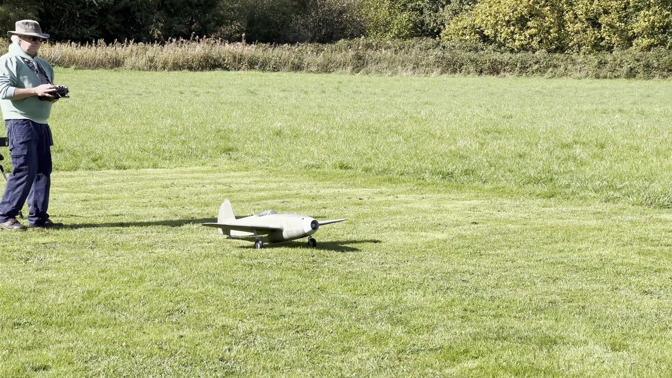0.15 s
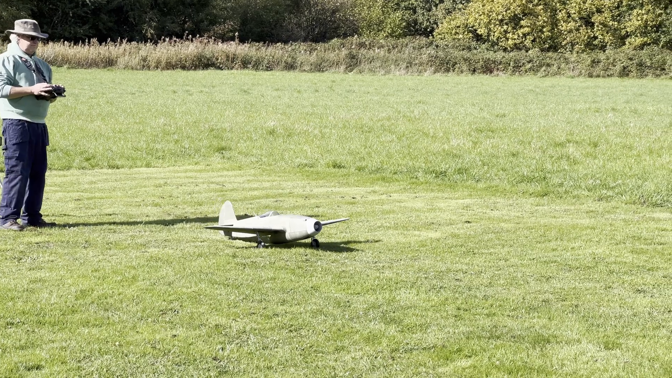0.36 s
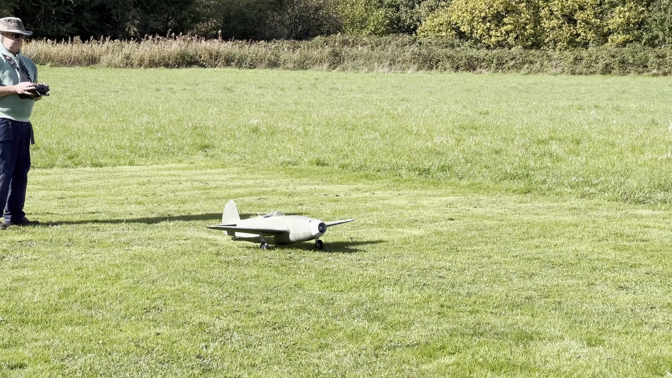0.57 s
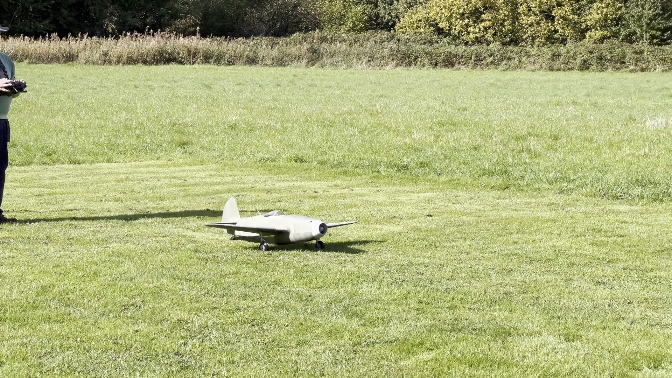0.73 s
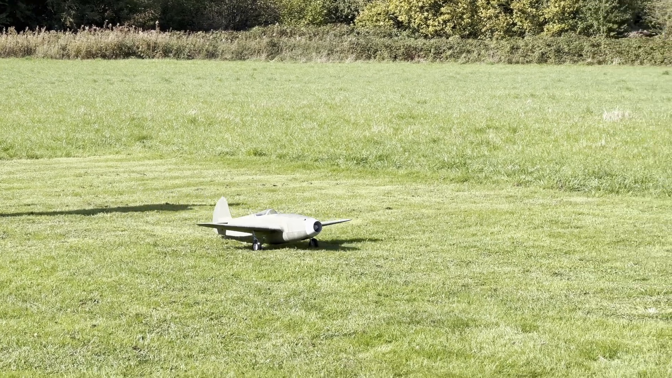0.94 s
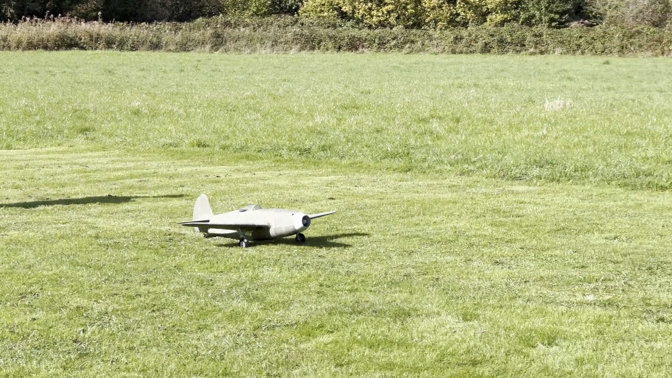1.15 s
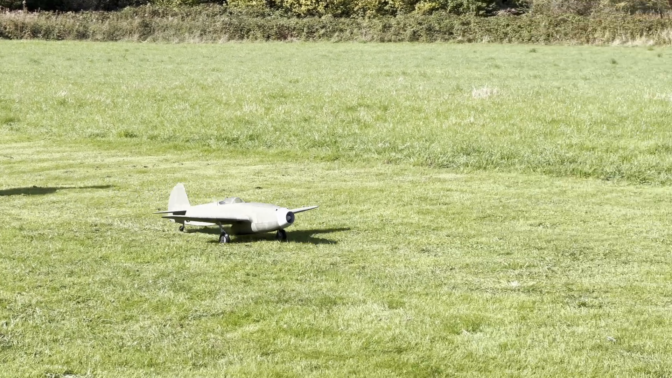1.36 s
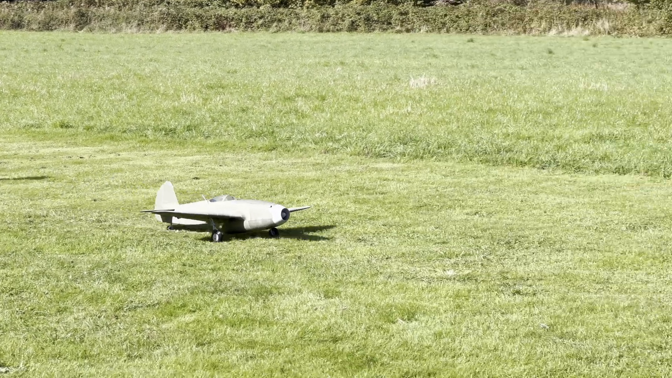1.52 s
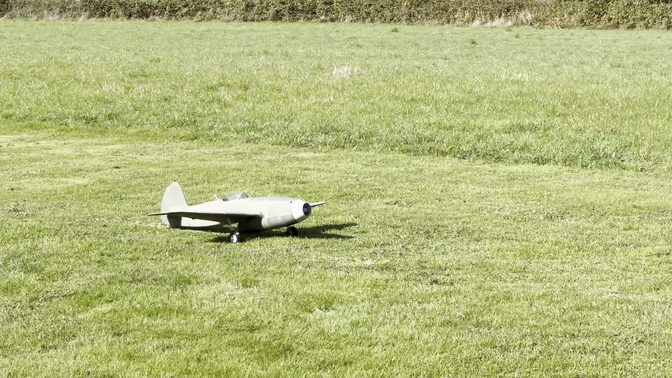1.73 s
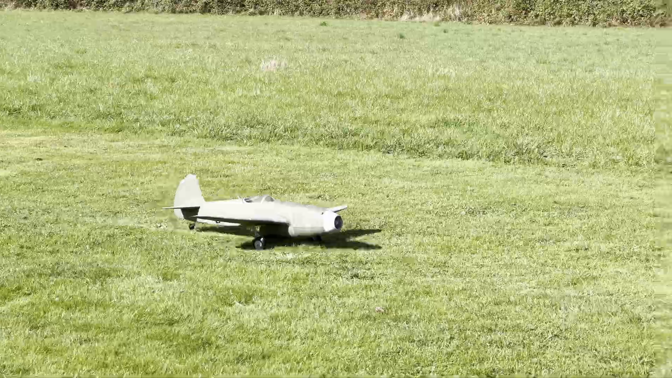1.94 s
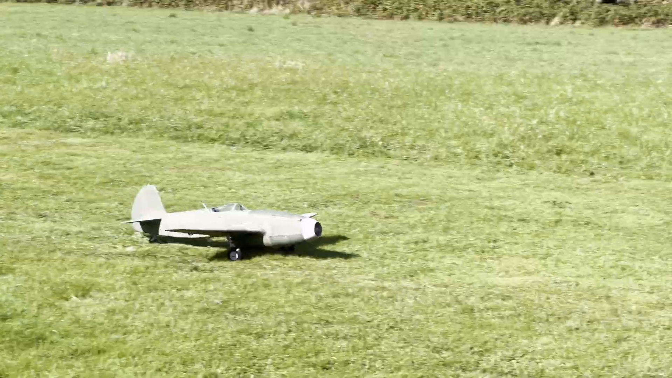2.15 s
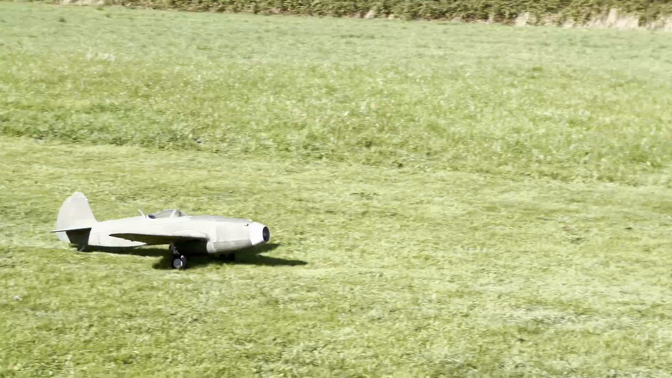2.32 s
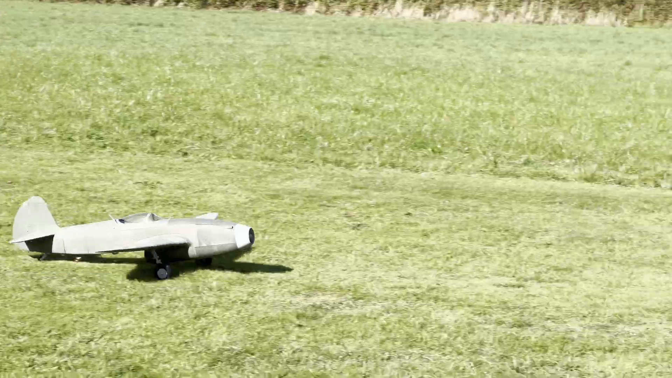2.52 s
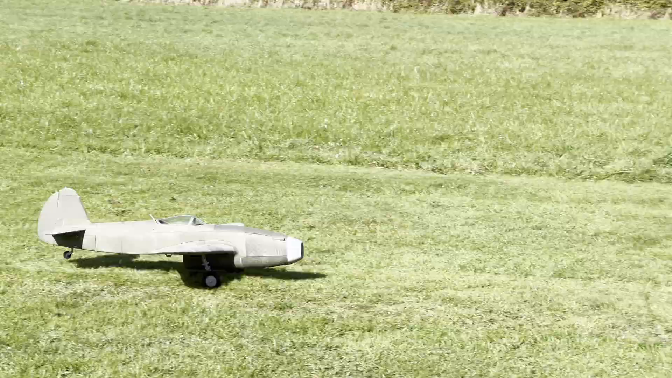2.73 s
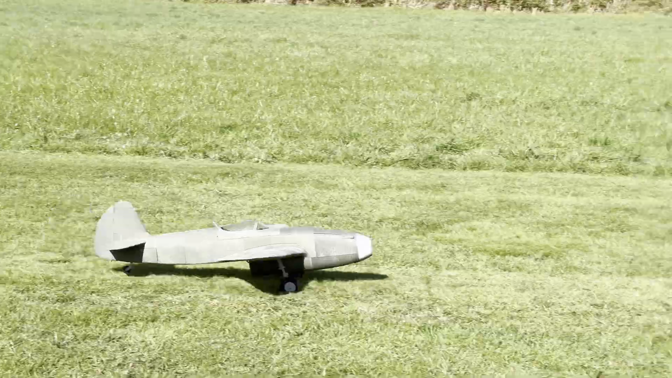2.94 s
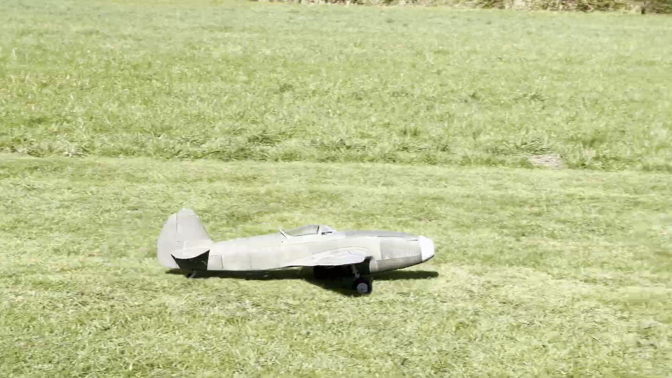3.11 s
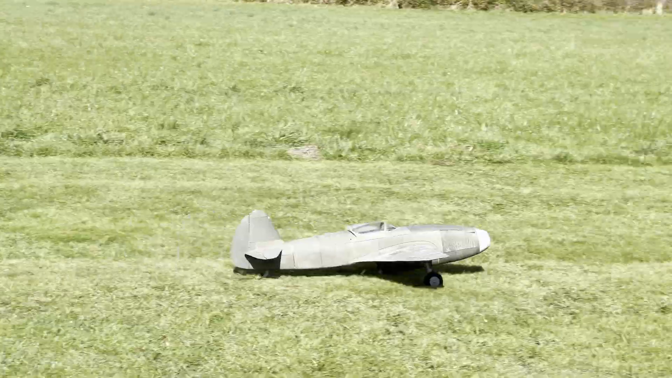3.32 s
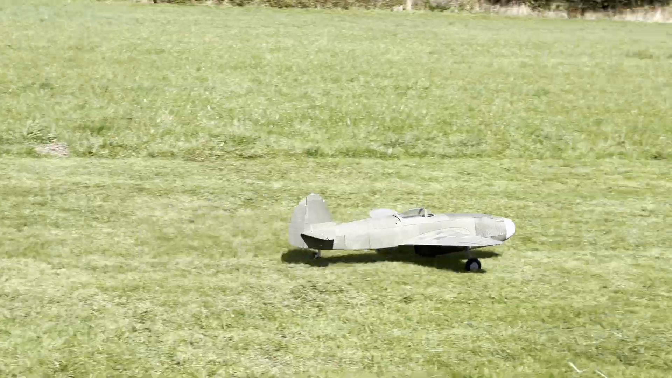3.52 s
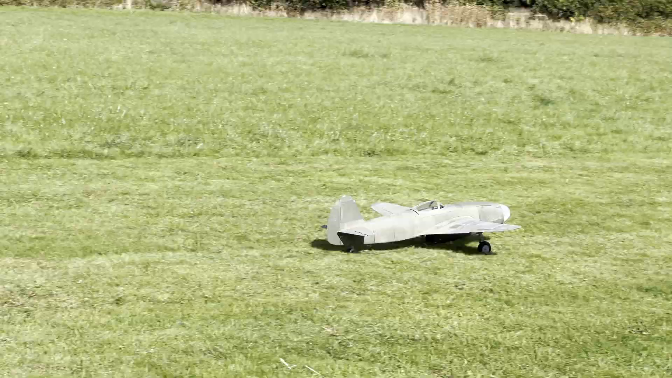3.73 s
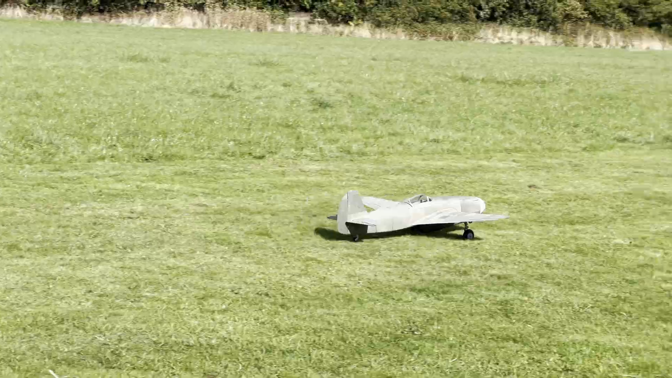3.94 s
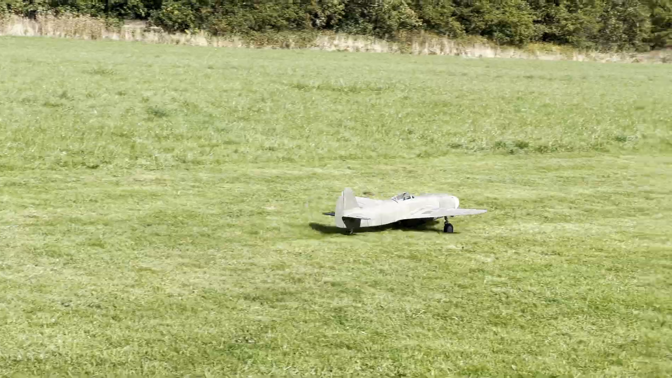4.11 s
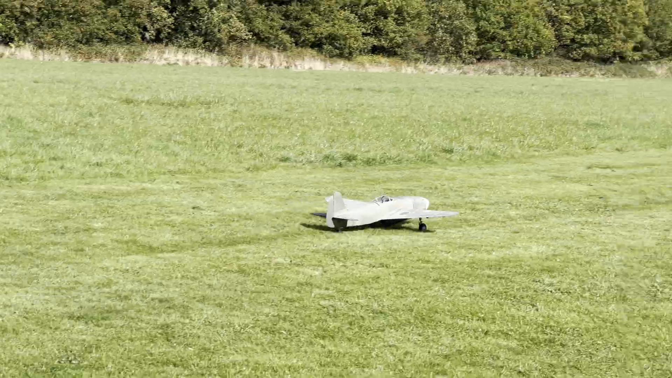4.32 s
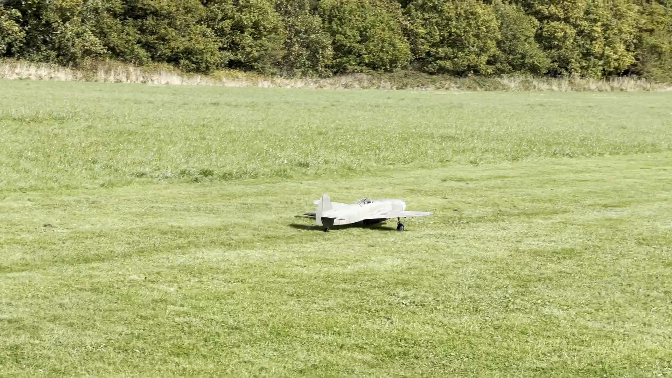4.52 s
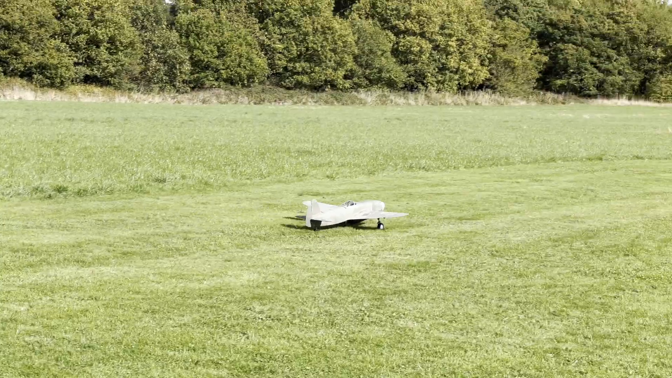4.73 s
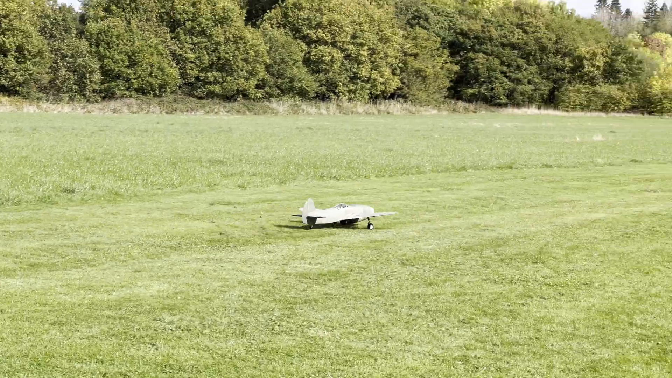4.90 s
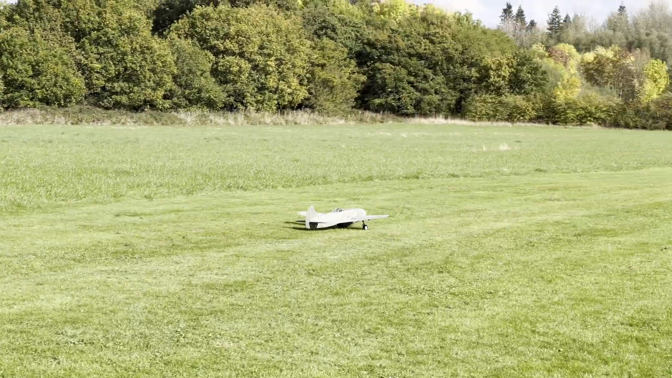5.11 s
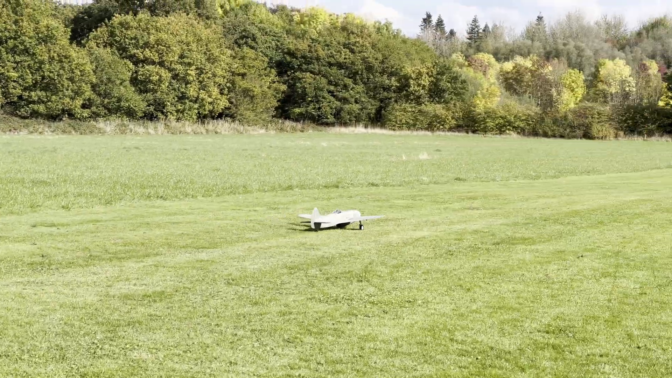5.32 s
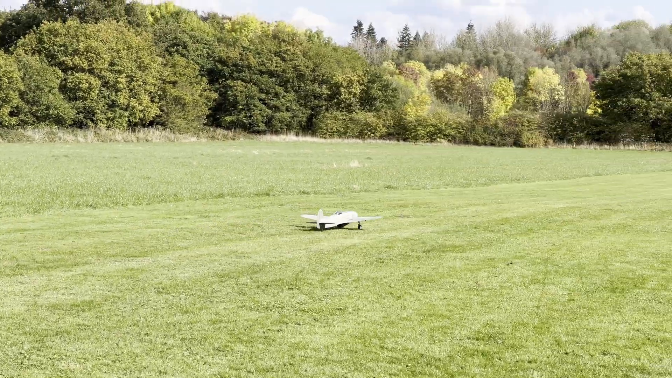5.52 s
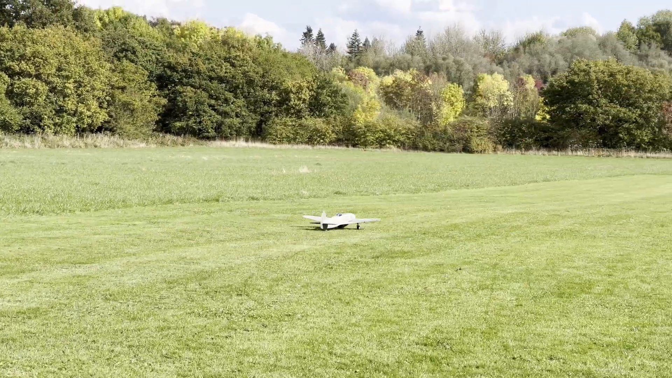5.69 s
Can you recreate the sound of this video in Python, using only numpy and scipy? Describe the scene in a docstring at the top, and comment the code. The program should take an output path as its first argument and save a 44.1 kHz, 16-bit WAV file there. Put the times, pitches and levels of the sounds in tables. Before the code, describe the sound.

High electric turbine whine over a broad airy blast approaches, passes with hollow bumps on turf, drops slightly in pitch and recedes outdoors.

```python
"""Model jet run past

A model jet with a twelve-blade electric ducted fan spools up on mown grass, gathers speed, passes and runs away.
The blades sing a whine over coloured duct noise; throttle, distance and angle off the nose set pitch, level and colour.
Wheels rumble on turf, bumps ring the hollow airframe, the gear clacks; a low outdoor rumble lies under it all."""
import sys
import numpy as np
from scipy import signal
from scipy.fft import rfft, irfft, next_fast_len
from scipy.io import wavfile
from scipy.ndimage import uniform_filter1d, map_coordinates

SR = 44100
rng = np.random.default_rng(int(sys.argv[2]) if len(sys.argv) > 2 else 0)


def unload_audio(sound):
    """Save the sound as a 16-bit wav file, at the path given as the first command line argument."""
    columns = np.transpose(np.atleast_2d(sound))
    # keep every value between -1 and 1, then stretch to whole-number steps
    steps = np.round(np.clip(columns, -1, 1) * 32767)
    wavfile.write(sys.argv[1], SR, steps.astype(np.int16))


N = 258381
TIME = np.arange(N) / SR

# Throttle moves. Each row: glide centre in s, new blade pitch in Hz before sag, waver and Doppler,
# glide time constant in s, blade tone strength in dB.
THROTTLE = [(0.059, 2710, 0.012, -22), (.104, 7300, .0125, 0), (.166, 7662, 0.014, -9),
            (1.405, 7240, 0.0125, -11), (1.481, 7985, .009, -13), (1.818, 8110, .005, -12),
            (1.853, 8342, 0.007, 0.5)]
# Modes of the hollow airframe. Each row: frequency in Hz, level in dB, 60 dB decay time in s.
AIRFRAME_MODES = [(50.5, 0, 0.052), (79, -2.5, 0.11), (121, 4.5, 0.046), (192.4, 2.5, 0.069),
                  (249, 5.5, 0.045), (327, 10.5, 0.034), (479, 9.5, 0.026), (654, 5, 0.019)]

BLADES = 12
IDLE_HZ = 950  # blade pitch before the throttle opens
# straight run from rest at steady acceleration; time and distance of the pass
ACCEL_M_PER_S2, PASS_S, DISTANCE_M = 1.915, 3.112, 5.017
SOUND_M_PER_S = 343
# loudness against fan speed: the treble comes in last
ROAR_DB_PER_DECADE, RUSH_DB_PER_DECADE, FAN_DB_PER_DECADE = 2.5, 40.5, 54


def amp(db):
    """Decibels to gain."""
    return 10 ** (np.asarray(db) / 20)


def unit(x):
    """Scale to rms 1."""
    return x / np.sqrt(np.mean(x ** 2) + 1e-20)


def along(points, hz):
    """Read (Hz, value) points on a log frequency axis."""
    point_hz, values = np.transpose(points)
    return np.interp(np.log(hz + 1), np.log(point_hz + 1), values)


def curves(rows):
    """One value per sample for each column after the time."""
    times_s, *columns = np.transpose(rows)
    return [np.interp(TIME, times_s, column) for column in columns]


def wobble(knots_per_s):
    """A smooth random curve of rms 1."""
    knots = rng.standard_normal(int(N * knots_per_s / SR) + 4)
    return unit(map_coordinates(knots, [TIME * knots_per_s]))


def step(centre_s, glide_s):
    """A smooth rise from 0 to 1."""
    return 0.5 + 0.5 * np.tanh((TIME - centre_s) / (2 * glide_s))


def dips(rows):
    """A gain of 1 with a bell-shaped dip for each (s, depth, half width at 1/e) row."""
    gains = [1 - min(depth, 1) * np.exp(-((TIME - s) / width_s) ** 2) for s, depth, width_s in rows]
    return np.prod(gains, axis=0)


def turning(hz):
    """The running phase of a pitch curve."""
    return 2 * np.pi * np.cumsum(hz) / SR


def filtered(x, response):
    """Multiply the spectrum of x by a complex response of frequency."""
    size = next_fast_len(N + 8192)
    spectrum = rfft(x, size) * response(np.fft.rfftfreq(size, 1 / SR))
    return irfft(spectrum, size)[..., :N]


def noise(colour):
    """Noise of rms 1 with the given (Hz, dB per Hz) colour."""
    return unit(filtered(rng.standard_normal(N), lambda hz: amp(along(colour, hz))))


def narrow(phase, width_hz):
    """A narrow band of noise of rms 1 around a moving pitch."""
    return unit(wobble(width_hz) * np.sin(phase) + wobble(width_hz) * np.cos(phase))


def spread(mid, side, side_db):
    """Left and right from a shared part and a weaker opposed part."""
    return mid + amp(side_db) * np.array([side, -side])


def path():
    """Geometry of the run: degrees off the nose, spreading gain in dB re the pass, Doppler factor."""
    ahead_m = ACCEL_M_PER_S2 / 2 * (TIME ** 2 - PASS_S ** 2)  # negative before the pass
    range_m = np.hypot(ahead_m, DISTANCE_M)
    receding_m_per_s = ACCEL_M_PER_S2 * TIME * ahead_m / range_m
    angle_deg = np.degrees(np.arctan2(DISTANCE_M, -ahead_m))
    spreading_db = 20 * np.log10(DISTANCE_M / range_m)
    return angle_deg, spreading_db, 1 / (1 + receding_m_per_s / SOUND_M_PER_S)


def facing(rows):
    """Read each column of an angle table in the listener's direction, one value per sample."""
    degrees, *columns = np.transpose(rows)
    angle_deg = path()[0]
    return [np.interp(angle_deg, degrees, column) for column in columns]


def motor():
    """Blade pitch and tone strength glide from one throttle setting to the next."""
    pitch_hz, tone_db = IDLE_HZ, THROTTLE[0][3]
    for centre_s, new_hz, glide_s, new_db in THROTTLE:
        share = step(centre_s, glide_s)
        pitch_hz = pitch_hz + share * (new_hz - pitch_hz)
        tone_db = tone_db + share * (new_db - tone_db)
    return pitch_hz, tone_db


def carried_db(db_per_decade):
    """Level re the last throttle setting at the pass: up with fan speed, down with distance."""
    return db_per_decade * np.log10(motor()[0] / THROTTLE[-1][1]) + path()[1]


def field():
    """The distant low rumble of open country: slowly drifting coloured noise."""
    # Each row: time in s, level in dB.
    level_rows = [(0, -48.5), (2, -48), (5.2, -45.5), (5.55, -43.5), (5.86, -47)]
    # Each row: frequency in Hz, relative level in dB per Hz.
    colour = [(20, -28), (36, -7.5), (57, 1), (85, -3.5), (140, -7.5), (250, -14), (700, -27),
              (1200, -23.5), (2200, -32.5), (4500, -62), (8000, -75), (16000, -60)]
    level_db = curves(level_rows)[0] + 0.28 * wobble(6.0)
    return amp(level_db) * spread(noise(colour), noise(colour), side_db=-20)


def eddies(patchy_db):
    """White noise with drifting time-frequency patches of gain."""
    cells = signal.stft(rng.standard_normal(N), nperseg=512)[2]
    patches = uniform_filter1d(rng.standard_normal(cells.shape), size=5, axis=0)
    patches = uniform_filter1d(patches, size=22, axis=1)
    return signal.istft(cells * amp(patchy_db * unit(patches)), nperseg=512)[1][:N]


def pipe_db(hz):
    """Open-pipe colour of the duct: a resonance at each multiple of its fundamental."""
    pipe_hz, depth_db, reach_hz = 449, 2, 2270
    ripple_db = depth_db * np.cos(2 * np.pi * hz / pipe_hz)
    return ripple_db * np.exp(-(hz / reach_hz) ** 2) * (hz > pipe_hz * 3 / 4)


def jet_band(air, lo_hz, hi_hz):
    """One band of the blast, each side's colour at rms 1, crossfaded as the jet turns its aspect."""
    # Each row: degrees off the nose, side facing the listener (0 nose, 1 front quarter, 2 beam, 3 and up tail).
    aspect_rows = [(32.5, 0), (37.7, 1), (44.8, 1.5), (55, 2), (76, 2), (116, 2.5), (168, 4)]
    # Blast colour from each side. Each row: frequency in Hz, relative level in dB per Hz.
    nose = [(150, -5.5), (450, -3), (680, -2.5), (880, -3.5), (1130, -9.5), (1350, -8), (1800, -9),
            (2300, -8), (2750, -15), (3400, -9.5), (5500, -7), (7400, -8.3), (8400, -7), (9500, -15),
            (11000, 0), (12900, -4.5), (13600, 1.5), (15500, -1.5)]
    quarter = [(150, -1), (400, 0.5), (600, -5.5), (930, 1.5), (1180, -12.5), (1350, -13), (1800, -9.5),
               (2150, -12.5), (2900, -4.5), (3900, -10.5), (4700, -5), (6500, -8.5), (8600, 0.5),
               (9800, -15), (12000, -12.5), (15500, -19)]
    beam = [(150, 5.5), (420, 5), (620, 3.5), (800, 0), (950, -3.5), (1120, -7.5), (1550, -17),
            (2100, -12.5), (2750, -8.5), (4500, -9.5), (6900, -8), (8700, 1), (9800, -14), (12000, -16.5),
            (15500, -17)]
    tail = [(150, -10), (400, -6), (640, -5.5), (900, -5.5), (1400, -16), (1750, -17), (2080, -20),
            (2450, -15.5), (4700, -15.5), (7000, -8.5), (8700, -11), (9800, -18.5), (12900, -22.5),
            (13700, -23), (15500, -23.5)]

    def response(hz, colour):
        window = ((1 + (lo_hz / (hz + 1)) ** 16) * (1 + (hz / hi_hz) ** 16)) ** -0.5
        return amp(along(colour, hz) + pipe_db(hz)) * window

    aspect, = facing(aspect_rows)
    band = np.zeros(N)
    for index, colour in enumerate((nose, quarter, beam, tail)):
        side = unit(filtered(air, lambda hz: response(hz, colour)))
        band += np.interp(aspect, np.arange(4), np.eye(4)[index]) * side
    return band


def blast():
    """Turbulent air: the exhaust roars, the duct rushes, the blade tips hiss and fizz."""
    # Radiation at the passing distance. Each row: degrees off the nose, then exhaust roar, rush,
    # blade hiss and fizz in dB before the band trims below.
    pattern = [(28.2, -38.5, -25.5, -24.5, -33.5), (29.3, -37, -28, -24, -32.5),
               (38.4, -36, -24.5, -26.5, -32), (48.7, -34, -27.5, -31.5, -34.5),
               (66.4, -36.5, -30.5, -34, -37.5), (80, -35, -30.5, -32.5, -38.5),
               (100.5, -37.5, -33, -33.8, -36.5), (120.6, -40.5, -33, -34.5, -35),
               (137.7, -38.5, -35.5, -34, -32), (148, -41, -38, -38, -35), (154.5, -41.5, -36.5, -36, -34),
               (161.3, -41.5, -38, -40, -38), (166.2, -41, -42.5, -47, -52), (168.5, -37, -53, -54, -49.5)]
    # Brief fizz dips as the jet runs away. Each row: time in s, depth 0-1, half width at 1/e in s.
    fizz_dips = [(3.87, 0.14, .05), (4.07, 0.46, 0.034), (4.25, .2, 0.032), (4.39, 0.36, .04),
                 (4.665, 0.42, 0.044), (4.91, 0.55, 0.14), (5.25, 0.54, 0.071), (5.42, .25, .06),
                 (5.79, 0.45, .06)]
    roar_db, rush_db, hiss_db, fizz_db = facing(pattern)

    roar_mid = jet_band(eddies(patchy_db=1.65), 163, 1210)
    roar_side = jet_band(eddies(patchy_db=1.5), 580, 980)
    roar = amp(roar_db + 1.5) * spread(roar_mid, roar_side, side_db=-14.5)

    rush_mid = jet_band(eddies(patchy_db=1.34), 1243, 4880)
    rush_side = jet_band(eddies(patchy_db=1), 4300, 6500)
    rush = amp(rush_db - 0.62) * spread(rush_mid, rush_side, side_db=-15.5)

    hiss = amp(hiss_db + 3.5) * jet_band(eddies(patchy_db=2.3), 4900, 9400)
    fizz_gain = amp(fizz_db + 8.0 + 0.66 * wobble(24.31)) * dips(fizz_dips)
    fizz = fizz_gain * jet_band(eddies(patchy_db=1.5), 10000, 15100)

    low = amp(carried_db(ROAR_DB_PER_DECADE)) * roar * amp([[1.1], [-1.1]])  # leans left
    middle = amp(carried_db(RUSH_DB_PER_DECADE)) * rush
    return low + middle + amp(carried_db(FAN_DB_PER_DECADE)) * (hiss + fizz)


def duct():
    """The duct beams bands of its noise; each sweeps over the listener, its pitch sliding with angle."""
    # Each row: centre in degrees off the nose, half width at 1/e in degrees, level in dB, pitch in Hz,
    # slide in Hz per degree, bandwidth in Hz.
    beams = [(29.8, 1, -35.5, 1800, 1.5, 410), (29.6, 2.8, -47, 5420, 2, 320),
             (29.2, 3.9, -40.5, 3150, -1, 350), (35.4, 3.86, -33, 2960, -5.5, 580),
             (43.9, 3.1, -35, 2900, -9, 420), (51.6, 6.9, -34.5, 2820, -7, 600),
             (61.5, 6.9, -33, 2740, -7, 620), (67.8, 3.1, -33, 2640, -6, 640),
             (83.5, 6.8, -38.5, 1950, -0.5, 450), (81, 3.7, -40, 2900, -0.5, 700),
             (102.1, 7.7, -37.5, 2600, -0.5, 400), (121, 4.5, -41.5, 2450, 0.5, 330),
             (158.3, 0.85, -42, 5600, 0.5, 2200), (161, .9, -40, 2900, 0, 1500),
             (168, .35, -47, 4500, 0, 3800), (34.5, 3.7, -30.5, 5800, -20.5, 900),
             (45, 5.5, -38, 5280, -32, 510), (43.4, 11, -39.5, 4650, -24.5, 410),
             (57.3, 7, -45, 4300, -29.5, 580), (89.3, 20, -43, 3700, -20, 1300),
             (99, 35, -44.5, 880, 0, 170), (48, 9, -34, 7200, -5, 500), (66, 5.1, -39.5, 3900, -23, 700),
             (77.7, 6.8, -37.5, 4300, -21, 510), (82.4, 3.25, -41, 3400, -16, 430),
             (118, 4.2, -36.5, 3750, -1.5, 960), (105, 14, -47, 7300, -4, 450),
             (139, 8.8, -39, 7050, -5, 580)]
    angle_deg, sound = path()[0], np.zeros(N)
    for centre_deg, half_width_deg, level_db, hz, slide_hz_per_deg, band_hz in beams:
        off_deg = angle_deg - centre_deg
        gain = amp(level_db) * np.exp(-(off_deg / half_width_deg) ** 2)
        sound = sound + gain * narrow(turning(hz + slide_hz_per_deg * off_deg), band_hz)
    return amp(carried_db(FAN_DB_PER_DECADE)) * sound


def fan():
    """Blades sing one clean tone; ragged inflow shakes it and spreads a skirt of noise round it."""
    # Rotor radiation. Each row: degrees off the nose, then blade tone (throttle strength adds to it),
    # noisy skirt and shaft hum in dB.
    pattern = [(28.5, -23.5, -34, -45.5), (29.1, -26, -34, -45.5), (29.7, -21, -36, -44.5),
               (30.3, -14.5, -37, -44.5), (31.1, -16, -37, -44), (33.2, -12.3, -37, -43.5),
               (41, -15, -28, -44.5), (55, -15, -37.5, -40), (85.6, -16.3, -47, -42.5),
               (109, -13.8, -44, -45), (116.5, -14.7, -43, -55), (140.2, -20, -35, -60),
               (142, -24, -34, -61), (159.4, -28, -38.5, -60), (168, -30.5, -49, -67)]
    # Whine waver. Each row: time in s, offset in Hz before sag and Doppler.
    waver_rows = [(1.8, 0), (1.9, 18), (2.3, 0.5), (2.93, -14), (3.15, 3.5), (3.42, 11.5), (3.79, 19),
                  (3.88, -14.5), (4.5, -7), (4.8, -20), (5, -13), (5.2, 18.5), (5.55, 5), (5.8, 15)]
    # Tone fades as the rocking jet swings its beam aside. Each row: time in s, depth 0-1, half width at 1/e in s.
    tone_fades = [(1.115, 0.85, 0.05), (1.59, .4, .02), (1.7, 0.6, 0.03), (1.965, 0.5, 0.057),
                  (2.003, 0.97, 0.017), (2.195, 0.36, 0.055), (2.345, 0.66, 0.025), (2.489, 0.64, 0.032),
                  (2.61, 0.68, 0.021), (2.729, 0.98, 0.022), (2.815, 0.4, 0.025), (2.89, 0.59, 0.026),
                  (2.993, 0.53, 0.024), (3.078, 0.76, 0.015), (3.302, 0.37, 0.014), (3.39, 0.13, .03),
                  (3.51, .25, 0.017), (4.1, 0.67, 0.05), (4.38, 0.4, 0.049), (4.742, .72, 0.045),
                  (4.783, 0.7, .014), (4.848, 0.8, 0.042), (5.08, .4, 0.025), (5.21, 0.95, 0.032),
                  (5.28, 0.76, 0.077), (5.51, 0.5, 0.082), (5.86, 0.65, 0.12)]
    # Brief octave dropouts, same columns.
    octave_fades = [(.86, .9, .08)]
    sag_per_s = 0.0042  # share of fan speed lost each second as the battery sags
    octave_peak_db, intake_cone_deg, cone_edge_db_per_deg = -34.5, 34, 1

    angle_deg, _, doppler = path()
    pitch_hz, throttle_db = motor()
    whine_db, skirt_db, hum_db = facing(pattern)
    speed_factor = (1 - sag_per_s * TIME) * doppler * (1 + 0.00056 * wobble(30))
    phase = turning((pitch_hz + curves(waver_rows)[0]) * speed_factor)

    tone_gain = amp(whine_db + throttle_db + 0.84 * wobble(40)) * dips(tone_fades)
    tone = tone_gain * unit(np.sin(phase))
    skirt = amp(skirt_db) * narrow(phase, width_hz=1200)

    # the octave leaves through the intake and falls off outside its cone
    octave_db = octave_peak_db - cone_edge_db_per_deg * np.maximum(angle_deg - intake_cone_deg, 0)
    octave_gain = amp(octave_db + 1.5 * wobble(25)) * dips(octave_fades)
    octave = octave_gain * unit(np.sin(2 * phase))

    hum = amp(hum_db + 0.29 * wobble(11.9)) * unit(np.sin(phase / BLADES))  # once per shaft turn
    hum_stereo = hum * amp([[1.4], [-1.4]])
    return amp(carried_db(FAN_DB_PER_DECADE)) * (tone + skirt + octave + hum_stereo)


def tufts():
    """An uneven patter of rms 1: each grass tuft flicks a wheel and briefly rings the airframe."""
    tufts_per_s = 45
    t = np.arange(SR // 8) / SR
    flicks = (rng.random(N) < tufts_per_s / SR) * rng.uniform(0.39, 1, N)
    ring = np.zeros(len(t))
    for k, (hz, level_db, t60_s) in enumerate(AIRFRAME_MODES):
        ring += (-1) ** k * amp(level_db - 60 * t / t60_s) * np.sin(2 * np.pi * hz * t)
    return unit(signal.fftconvolve(flicks, ring)[:N])


def rolling():
    """Wheel rumble on turf: grows with speed, swells on rough stretches, ends as the wings take the weight."""
    # Rough stretches. Each row: start in s, end in s, extra rumble in dB.
    rough_rows = [(2.182, 2.37, 4), (2.42, 2.753, 2), (2.8, 2.919, 3), (2.976, 3.15, 7), (3.168, 3.275, 8),
                  (3.301, 3.465, 4.5), (3.737, 3.85, 8), (3.888, 4.097, 11), (4.132, 4.333, 9.5),
                  (4.35, 4.43, 2), (4.485, 4.62, 10), (4.636, 4.773, 6.5)]
    # Each row: frequency in Hz, relative level in dB per Hz.
    turf_colour = [(20, -8), (43, -2), (60, 4), (160, 3.5), (260, -1.2), (370, -7.5), (560, -19),
                   (800, -26), (2000, -80)]
    base_db, db_per_decade = -40, 46  # at the pass on smooth turf; growth with speed
    unload_s, unload_fade_s, edge_s = 4.79, 0.03, 0.011
    grazing_loss = 1.94  # sound made down in the grass loses this many times the usual dB with distance

    speed_gain = (TIME / PASS_S) ** (db_per_decade / 20)
    loaded = 1 - step(unload_s, unload_fade_s)
    rough_db = sum(db * (step(start_s, edge_s) - step(end_s, edge_s)) for start_s, end_s, db in rough_rows)
    rumble = amp(1.7 * wobble(55)) * spread(noise(turf_colour), noise(turf_colour), side_db=-10.5)
    ground = rumble + amp(-12.5) * tufts()
    return speed_gain * loaded * amp(base_db + rough_db + grazing_loss * path()[1]) * ground


def bumps():
    """Each bump rings the airframe modes, a hard one more brightly, a heavy one with more bass."""
    # Each row: time in s, peak in dB before a 1 dB cut, hardness as a cut-off in Hz, weight as extra bass in dB.
    hits = [(2.821, -21, 120, -3), (2.882, -21, 160.7, 6), (2.999, -13, 191, -10), (3.023, -17.5, 380, -2),
            (3.045, -20, 200, 2), (3.085, -19, 230, 2), (3.114, -23, 200, 3), (3.133, -21, 280, -6),
            (3.165, -20.5, 320, -4), (3.188, -16, 350, 8), (3.196, -15.5, 560, -4), (3.216, -10.5, 440, 4),
            (3.227, -21, 130, 9), (3.252, -22, 330, 2), (3.297, -22, 90, 8), (3.328, -20.5, 380, -7),
            (3.353, -19.5, 450, -7), (3.366, -25, 198, 0), (3.395, -22, 110, 6), (3.43, -23, 80, 11),
            (3.739, -31, 350, -2), (3.779, -25, 161, -3), (3.804, -28, 260, 1), (3.82, -19, 230, 2),
            (3.934, -28, 110, 8), (3.952, -24, 60, 8), (3.968, -21, 553, -6), (3.986, -26, 54.5, 10),
            (4.006, -15.5, 470, 2), (4.14, -18, 720, -7), (4.187, -22, 450, -1), (4.216, -27.5, 201, -4),
            (4.275, -27, 394, -5), (4.304, -17, 190, 7.5), (4.47, -23.5, 209, -8), (4.508, -28, 300, -11),
            (4.545, -27, 454, -5), (4.572, -26, 400, -1), (4.616, -29.5, 348, -0.5), (4.744, -35, 190, 8)]
    weight_hz = 100  # a heavy bump pushes hardest below this
    t = np.arange(SR // 4) / SR
    thumps = np.zeros(N + SR)
    for s, peak_db, hard_hz, weight_db in hits:
        ring = np.zeros(len(t))
        for k, (hz, level_db, t60_s) in enumerate(AIRFRAME_MODES):
            bass_db = weight_db / (1 + (hz / weight_hz) ** 4)
            mode_db = level_db + bass_db + rng.normal(0, 1.4) - 60 * t / t60_s
            mode_gain = (-1) ** k * amp(mode_db) / (1 + (hz / hard_hz) ** 4)
            ring += mode_gain * np.sin(2 * np.pi * hz * (1 + rng.normal(0, 0.06)) * t)
        ring *= 1 - np.exp(-t * hard_hz / 0.82)  # soft ground takes the load gradually
        thumps[round(s * SR):][:len(t)] += amp(peak_db - 1.0) * ring / np.abs(ring).max()
    return thumps[:N]


def gear():
    """Short dry clacks of the wheel legs: noise bursts with a 27 ms decay to -60 dB."""
    # Each row: time in s, level in dB.
    clacks = [(3.416, -24.5), (4.671, -36)]
    # Each row: frequency in Hz, relative level in dB per Hz.
    colour = [(250, -10), (500, 1), (900, 0), (1400, 7), (2200, -12), (5000, -17.5)]
    knocks = sum(amp(db - 60 * np.abs(TIME - s) / 0.027) * (TIME >= s) for s, db in clacks)
    return knocks * noise(colour)


def scene():
    """The jet and the field around it."""
    return field() + blast() + duct() + fan() + rolling() + bumps() + gear()


def record(dry):
    """The microphone sheds deep bass; its two ports drift apart in phase towards the treble band limit."""
    # Phase between the ports. Each row: frequency in Hz, left lead in radians.
    port_phase = [(20, 0), (2200, 0), (3100, .4), (4600, .45), (5900, -.4), (7100, -.1), (7800, -.7),
                  (8500, -1.05), (9450, -3.0), (10500, -3.35), (12000, -4.9), (13000, -6.2), (14100, -6.45),
                  (14700, -7.4), (15900, -8.7)]
    low_cut_hz, top_hz = 42, 15800

    def response(hz):
        low_cut = (1 + (low_cut_hz / (hz + 1)) ** 6) ** -0.5
        ports = np.exp(0.5j * np.outer([1, -1], along(port_phase, hz)))
        return low_cut * ports * (hz < top_hz)

    return filtered(dry, response)


dry = scene()
out = record(dry)
unload_audio(out)
```